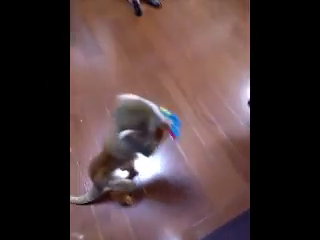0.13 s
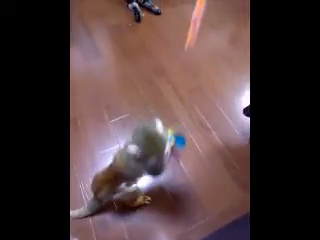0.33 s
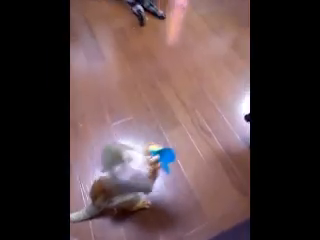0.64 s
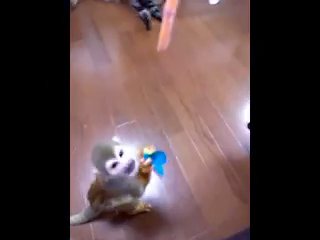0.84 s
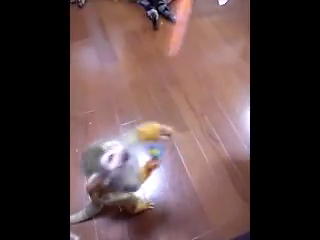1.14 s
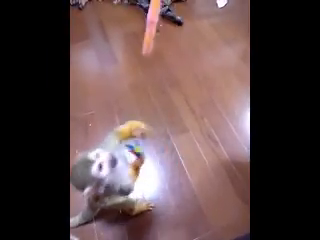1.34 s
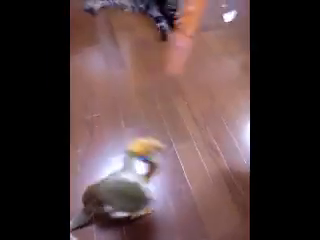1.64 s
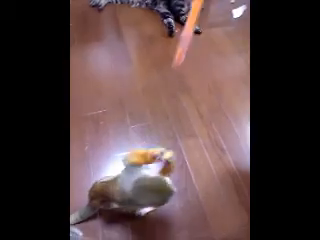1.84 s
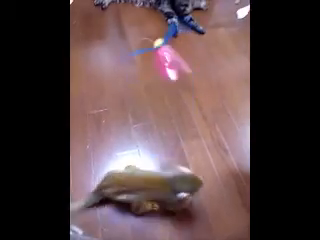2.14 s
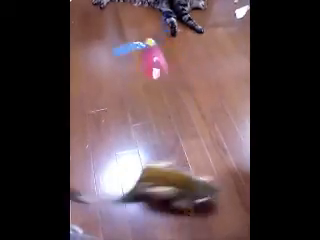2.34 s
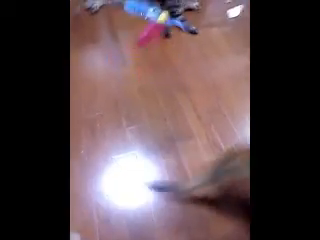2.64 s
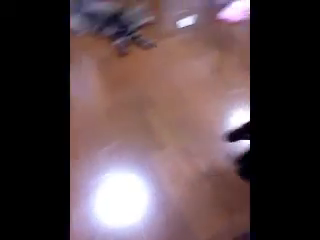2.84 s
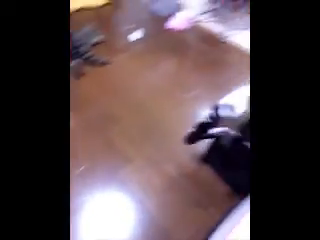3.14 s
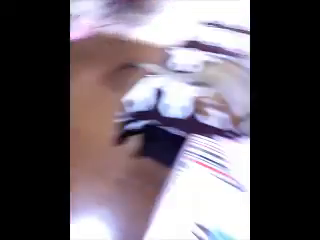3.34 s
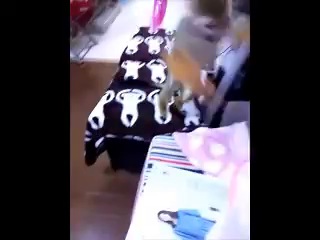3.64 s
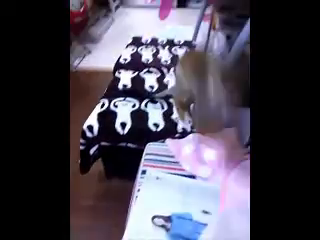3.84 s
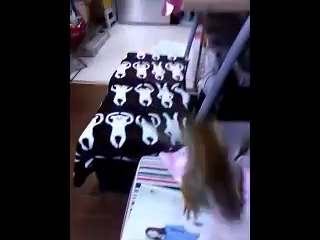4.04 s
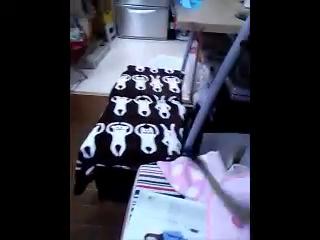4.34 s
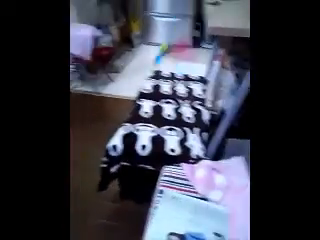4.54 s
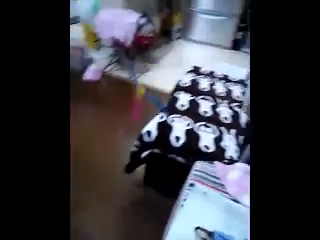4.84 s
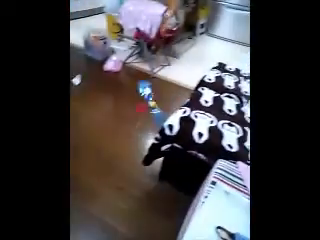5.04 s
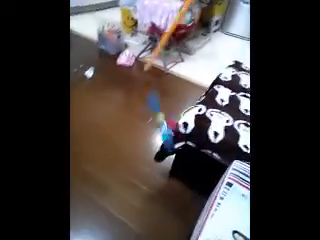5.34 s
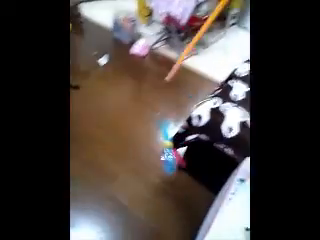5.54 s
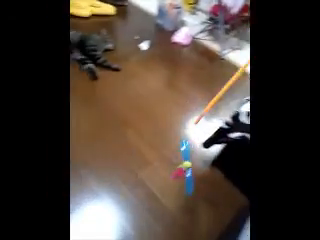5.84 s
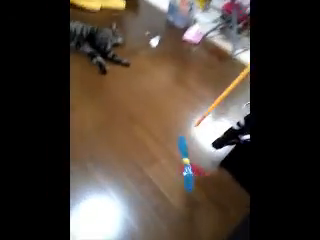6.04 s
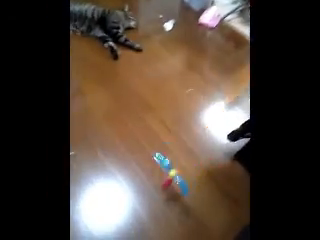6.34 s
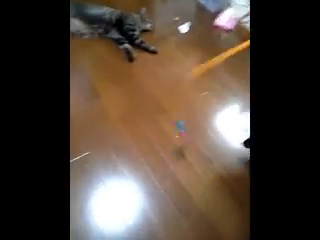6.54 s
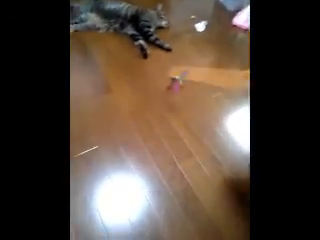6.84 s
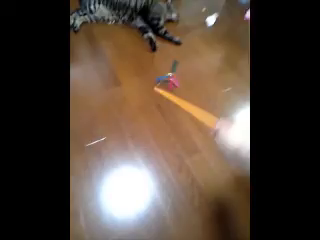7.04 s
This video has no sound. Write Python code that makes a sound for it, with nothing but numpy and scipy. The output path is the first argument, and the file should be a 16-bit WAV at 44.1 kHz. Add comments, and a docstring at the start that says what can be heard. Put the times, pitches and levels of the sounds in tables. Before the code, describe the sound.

Crisp plastic ticks and scuffs, hard knocks on wood and one deep thump over low handling rumble, then a soft swish across floorboards.

```python
"""A small pet monkey and a cat play with a plastic teaser toy on a wooden floor, close to a hand-held phone.
From the start the toy ticks, clacks and scuffs: bursts of tiny slips and short damped vibrations.
Bouts of movement raise low rumble, dull rub and bright rustle, all shaped noise with shared start and end times.
Knocks on wood ring as damped modes under padded pushes; a heavy thump near 4.5 s adds a deep boom.
Paws slide softly on bedding, then near 6 s the toy swishes over the boards; a small live room answers throughout."""
import sys
import numpy as np
from scipy import signal
from scipy.fft import rfft, irfft, next_fast_len
from scipy.io import wavfile
from scipy.ndimage import uniform_filter1d

SR = 44100
rng = np.random.default_rng(int(sys.argv[2]) if len(sys.argv) > 2 else 0)


def inscribe(sig):
    """Save sig as 16-bit PCM at rate SR to the path in sys.argv[1].

    A 1-D sig is mono; a 2-D sig holds one channel per row.
    Samples are clipped to [-1, 1] before scaling.
    """
    pcm = np.round(np.clip(np.atleast_2d(sig).T, -1, 1) * 32767)
    wavfile.write(sys.argv[1], SR, pcm.astype(np.int16))


N = 317387
T = np.arange(N) / SR  # time axis, s

# Colour of the handling rumble. Each row: frequency in Hz, spectrum level in dB.
HANDLING_COLOUR = [(12, -18.5), (22, 0.5), (31, -3), (45, -5), (62, -19), (100, -18.5), (150, -33.5),
                   (250, -33.5), (600, -60)]
# Colour of the dull rub and air. Each row: frequency in Hz, spectrum level in dB.
AIR_COLOUR = [(40, -0.5), (130, 9), (200, -3), (300, 0), (450, 2), (620, -4.5), (740, 1.5), (1000, -3),
              (1200, -18.5), (2000, -11.5), (4000, -25), (12000, -26)]
# Colour of the bright rustle. Each row: frequency in Hz, spectrum level in dB.
RUSTLE_COLOUR = [(800, 5), (2000, -2), (3000, -5.5), (5000, -6.5), (7000, -3.5), (9000, 2), (11500, 5),
                 (13000, -9)]
# Colour of sliding friction. Each row: frequency in Hz, spectrum level in dB.
SWISH_COLOUR = [(150, -21.5), (300, 1), (470, 5), (650, -6), (1000, 1), (1300, -3.5), (1800, -9),
                (2700, -12.5), (4000, -19.5), (7000, -28), (12000, -24.5)]
# Colour of slipping thin plastic. Each row: frequency in Hz, spectrum level in dB.
PLASTIC_COLOUR = [(300, -10), (1200, -15.5), (2000, -9.5), (2900, -6), (4000, -7), (6100, -2.5),
                  (7500, -1.5), (9500, 4), (11500, 5.5), (13000, 0.5)]
# Reverberation of the room. Each row: band centre in Hz, 60 dB decay time in s.
ROOM_DECAY = [(100, 0.23), (400, 0.24), (1500, 0.32), (5000, 0.28), (11000, 0.16)]
# Bouts of movement; each shakes the phone, rubs cloth and stirs fur at once.
# Each row: start in s, end in s (both at half amplitude), then rumble, dull rub and bright rustle in dB.
MOVEMENT_BOUTS = [(-.05, 0.57, -40, -53.5, -57.5), (0.564, 0.73, -49, -53, -67),
                  (0.796, 1.013, -41, -56, -56), (1.132, 1.432, -45, -59.5, -58.5),
                  (1.517, 1.951, -35, -48, -55), (1.938, 2.214, -41, -50.5, -58),
                  (2.213, 2.372, -35, -48.5, -51), (2.495, 2.715, -38.5, -53.5, -55),
                  (2.694, 2.868, -38.5, -46.5, -45), (3.028, 3.343, -35, -54.5, -49),
                  (3.378, 3.747, -33, -49, -51.5), (3.79, 4.175, -39, -56.5, -56),
                  (4.287, 4.496, -39, -63, -49), (4.464, 4.709, -27, -53, -50),
                  (4.73, 5.369, -33, -53.5, -58), (5.45, 6.79, -34, -54, -81),
                  (6.875, 7.045, -37.5, -51.5, -86), (7.102, 7.25, -38.5, -51.5, -72)]
# Levels between bouts. The entries: rumble, dull air and bright hiss in dB.
REST_LEVELS_DB = (-52, -58, -68)
# Duration of the fade at the end of a bout. The entries: rumble, dull rub and bright rustle in s.
BOUT_RELEASE_S = (0.056, 0.035, 0.38)
# Soft friction, first of paws on bedding, then of the toy gliding over the boards.
# Each row: middle in s, level in dB before the path gains, half length in s.
SLIDE_STROKES = [(4.735, -55, 0.7), (6.12, -43.5, .57)]
# A thin edge chafing. Each row: start in s, level in dB before onset and decay, 60 dB decay time in s.
CHAFE_STROKES = [(4.348, -44.5, .14), (6.058, -49.5, 0.66)]
# Scuffs of paws and crumpling toy blades.
# Each row: middle in s, peak level in dB, half length in s, top-end tilt in dB.
SCUFF_STROKES = [(0.01, -29, 0.016, -1.5), (0.044, -32.5, 0.018, -12), (0.534, -43, 0.021, -10),
                 (0.58, -21, 0.019, 15), (0.609, -32, 0.012, -2), (0.865, -50.5, 0.021, -6),
                 (0.992, -47.5, 0.018, -2.5), (1.693, -41.5, 0.058, -5.5), (1.873, -45.5, 0.059, 0.5),
                 (2.14, -46, 0.029, -11.5), (2.642, -44.5, 0.055, 5), (2.765, -34, 0.038, -9),
                 (3.063, -52, 0.04, -11), (4.343, -51, 0.027, -6), (4.784, -46, 0.084, -0.5)]
# Landings on wood. Each row: start in s, level in dB, time scale of contact in ms,
# deep boom against the knock in dB, share sent to the room in dB.
LANDINGS = [(3.166, -27, 0.47, -30, -6), (3.1762, -23.5, 0.44, -31, -2), (3.186, -31.5, 0.54, -22, 1),
            (3.421, -39, 5.2, -5, 8), (3.5057, -10.5, 0.31, -17, -10), (3.526, -22.5, 0.8, -7, -16),
            (3.542, -21, 0.75, -24, -14), (3.806, -39.5, 0.21, -30, 3.5), (4.5185, -26, 0.4, -11, -3.5),
            (4.5200, -16, 1.3, 10, -4.5), (4.547, -27.5, 0.58, 8, -5.5), (4.62, -25, 0.19, 2.5, -21),
            (4.807, -44, 2, -14, 0), (4.998, -34, 0.58, -22, -17), (6.78, -42, 3.1, -17, 3.5),
            (6.894, -51.5, 1, -16, 11.5)]
# Modes of the struck wood. Each row: nominal frequency in Hz, 60 dB decay time in s, strength in dB.
WOOD_MODES = [(294, 0.028, 1), (380, 0.012, 6), (565, 0.04, -4.5), (700, 0.016, 3.5), (1004, 0.011, 0.5),
              (1405, 0.0095, 4), (1940, 0.0089, 2), (2750, 0.0089, 3.5)]
# Stiff parts of toy and furniture. Each row: start in s, level in dB, pitch in Hz, 60 dB decay time in ms.
CLACK_NOTES = [(.668, -32.5, 5920, 3.3), (0.8878, -30.5, 5940, 5.3), (2.6722, -36, 5870, 6),
               (2.847, -39, 1700, 33), (3.056, -47.5, 1570, 98), (3.168, -24.5, 594, 24),
               (3.1775, -25, 566, 26), (3.8065, -37, 800, 22), (4.6197, -24, 1360, 8.7),
               (4.622, -24.5, 494, 26), (4.663, -37.5, 2590, 7), (4.674, -26.5, 423, 10.7),
               (4.712, -36.5, 2750, 4.4), (4.998, -60, 806, 10), (6.060, -42, 2700, 7)]
# Sharp ticks of plastic and claws. Each row: start in s, level in dB, time scale in ms,
# top-end tilt in dB, share sent to the room in dB.
TICK_HITS = [(0.0488, -21.5, 1.4, 20, 1), (0.3855, -43.5, 6.7, -11, -4), (0.501, -44, 2.2, 6, 0),
             (0.5541, -15.5, 2.2, 13.5, -5), (0.6651, -31, 5.4, -2, 0.5), (0.8839, -26, 4.8, 2, 2.5),
             (1.708, -36, 5.8, -16, -5), (1.808, -36.5, 4.5, -3.5, -1), (2.119, -41, 2.9, 14, 6.5),
             (2.672, -31, 5.2, 0, 1), (2.752, -22, 6.3, -2, 1.5), (2.807, -25, 3.8, -6.5, -4.5),
             (2.846, -29.5, 5.8, 1, -3), (3.057, -34.5, 9.1, -9, -4), (3.175, -39, 3.5, 3, -2),
             (4.2243, -29, 4, -0.5, 4), (4.6168, -26, 8.3, -4, -1.5), (4.663, -24, 1.4, 2, -5),
             (4.673, -30, 1.6, -5, -6), (4.7096, -23, 1.6, -1.5, -8.5), (4.977, -35, 7.7, 5.5, -1),
             (5.217, -38, 2.9, 9, -0.5)]

BOUT_ATTACK_S = 0.071
# the floor's reflection: lag at the middle of a slide and strength
SLIDE_ECHO_MS, SLIDE_ECHO_DB = 2.323, -16.5
SLIDE_ECHO_SHRINK = 0.2  # one half length away, the lag is divided by 1 plus this
CHAFE_HZ, CHAFE_RING_S, CHAFE_ATTACK_S = 2800, 0.008, 0.003
PAD_HZ = 3260  # soft paws put in next to nothing above this
BOOM_HZ, BOOM_T60_S = 104, 0.06
STIFF_ROOM_DB = -13  # share of clacks and chafes sent to the room
FAR_DIRECT_DB, FAR_ROOM_DB = -1.0, -6.0  # path gains of slides and rub
TOP_HZ = 12080


def undb(db):
    """Amplitude gain is an exponential function of decibels."""
    return 10 ** (np.asarray(db) / 20)


def unit(x):
    """Dividing by the root mean square gives a signal unit power."""
    return x / np.sqrt(np.mean(x ** 2))


def on_log_hz(points, hz):
    """Values between (Hz, value) points are interpolated on a logarithmic frequency axis."""
    f, value = np.transpose(points)
    return np.interp(np.log(hz + 1), np.log(f), value)


def colour(x, points, tilt_db=0, hinge_hz=8000):
    """A folded cepstrum gives the causal, minimum-phase filter of a spectrum; tilt raises its top end."""
    size = 2 * next_fast_len(len(x))
    hz = np.arange(size // 2 + 1) * SR / size
    db = on_log_hz(points, hz) + tilt_db * np.tanh((hz - hinge_hz) / 2200) / 2
    cepstrum = irfft(np.log(undb(db)))
    cepstrum[1:size // 2] *= 2
    cepstrum[size // 2 + 1:] = 0
    response = np.exp(rfft(cepstrum))
    return irfft(rfft(x, size) * response)[:len(x)]


def walk(rate):
    """Random levels held for 1 / rate s and averaged twice make a slow fluctuation of rms 1."""
    hold = int(SR / rate)
    steps = np.repeat(rng.standard_normal(N // hold + 1), hold)
    smooth = uniform_filter1d(uniform_filter1d(steps, hold), hold)
    return unit(smooth[:N])


def waver(x, depth_db, rate):
    """Independent gains in overlapping third-octave bands keep the colour of a noise shifting."""
    size = next_fast_len(N)
    spectrum = rfft(x, size)
    hz = np.arange(len(spectrum)) * SR / size
    band = np.clip(3 * np.log2((hz + 1) / 200), 0, 14)  # the end bands take in all that lies beyond
    out = 0
    for k in range(15):
        part = irfft(spectrum * np.maximum(1 - abs(band - k), 0), size)[:N]
        out = out + part * undb(depth_db * walk(rate))
    return unit(out)


def grains(count, spread_db):
    """Friction is a dense series of tiny impulses of very unequal size."""
    excess = np.minimum(rng.exponential(size=count), 5)
    return rng.standard_normal(count) * undb(spread_db * excess)


def mode(hz, t60_s):
    """A damped resonance is a sine under an exponential decay."""
    t = T[:8192]
    return undb(-60 * t / t60_s) * np.sin(2 * np.pi * hz * t)


def hit_level(x, db):
    """A transient is scaled by energy: that of 5 ms of steady sound at this level."""
    return x * undb(db) * np.sqrt(0.005 * SR / np.sum(x ** 2))


def add(track, s, sound, sends=1):
    """Sounds superpose linearly: mix one in at a time, with one gain for each row of the track."""
    start = int(s * SR)
    part = sound[max(-start, 0):N - start]
    track[..., max(start, 0):max(start, 0) + len(part)] += np.multiply.outer(sends, part)


def room(x, gap_s=0.0088):
    """Reverberation: after a short gap, walls and furniture return a dense decaying tail of equal energy."""
    t = T[:20000]
    spectrum = rfft(rng.standard_normal(len(t)))
    hz = np.arange(len(spectrum)) * SR / len(t)
    tail = 0
    for centre, t60 in ROOM_DECAY:
        band = on_log_hz([(f, float(f == centre)) for f, _ in ROOM_DECAY], hz)
        tail = tail + irfft(spectrum * band) * undb(-60 * t / t60)
    growth = (t / gap_s) ** 4
    tail = tail * growth / (1 + growth)
    return signal.fftconvolve(x, tail / np.sqrt(np.sum(tail ** 2)))[:N]


def movement():
    """Powers of independent noises add: bouts set in, hold and fade. Rows: gain of rumble, rub, rustle."""
    power = np.outer(undb(REST_LEVELS_DB) ** 2, np.ones(N))
    release_s = np.array(BOUT_RELEASE_S)[:, None]
    for start, end, *db in MOVEMENT_BOUTS:
        ramp = np.minimum((T - start) / BOUT_ATTACK_S, (end - T) / release_s)
        bout = np.clip(0.5 + ramp, 0, 1)
        power = power + (undb(db)[:, None] * bout) ** 2
    return np.sqrt(power)


def handling(gain):
    """Structure-borne rumble of the hand holding the phone: low noise, evened out and then set by the gain."""
    rumble = colour(rng.standard_normal(N), HANDLING_COLOUR)
    return gain * rumble / np.sqrt(uniform_filter1d(rumble ** 2, size=6000))


def rubbing(gain):
    """Cloth friction is dull, gently wavering noise that sinks back into the room's air."""
    return waver(colour(rng.standard_normal(N), AIR_COLOUR), depth_db=3.5, rate=22) * gain


def stirring(gain, flutter_db=0.85):
    """Many fine slips add up to a bright rustle that never quite stops while the animals move."""
    rustle = unit(colour(grains(N, spread_db=1.5), RUSTLE_COLOUR))
    return rustle * gain * undb(flutter_db * walk(45))


def slide(uneven_db=1.14):
    """Comb filtering by the floor's reflection shifts the colour of friction hiss as the contact moves."""
    hiss = waver(colour(grains(N, spread_db=2.5), SWISH_COLOUR), depth_db=2.3, rate=22)
    out = 0
    for s, db, half_s in SLIDE_STROKES:
        away = ((T - s) / half_s) ** 2
        lag_s = SLIDE_ECHO_MS / 1000 / (1 + SLIDE_ECHO_SHRINK * away)
        echo = undb(SLIDE_ECHO_DB) * np.interp(T - lag_s, T, hiss)
        out = out + unit(hiss + echo) * undb(db) * np.exp(-away)
    return out * undb(uneven_db * walk(28))


def chafes():
    """Sustained excitation: slips keep one stiff resonance ringing in a narrow, bright, fading note."""
    out, t = np.zeros((2, N)), T[:16384]
    for s, db, t60_s in CHAFE_STROKES:
        slips = grains(len(t), spread_db=2.5)
        ring = unit(signal.fftconvolve(slips, mode(CHAFE_HZ, CHAFE_RING_S))[:len(t)])
        onset = 1 - np.exp(-t / CHAFE_ATTACK_S)
        decay = np.exp(-np.log(1000) * t / t60_s)
        add(out, s, ring * onset * decay * undb(db), [1, undb(STIFF_ROOM_DB)])
    return out


def scuffs(room_db=-6):
    """A scuff is a swelling and fading cloud of slips, with the plastic colour of a tick."""
    out, t = np.zeros((2, N)), T[:16384]
    middle = t[-1] / 2
    for s, db, half_s, tilt_db in SCUFF_STROKES:
        cloud = unit(colour(grains(len(t), spread_db=1.5), PLASTIC_COLOUR, tilt_db))
        swell = np.exp(-((t - middle) / half_s) ** 2)
        add(out, s - middle, undb(db) * cloud * swell, [1, undb(room_db)])
    return out


def knocks():
    """A padded push excites the modes of wood; longer contact is duller, and a deep boom carries the weight."""
    out, t = np.zeros((2, N)), T[:1024]
    pad = signal.butter(6, PAD_HZ, fs=SR, output="sos")
    for s, db, contact_ms, boom_db, room_db in LANDINGS:
        age = t * 1000 / contact_ms
        push = signal.sosfilt(pad, age ** 2 * np.exp(-3 * age))
        detune = 1 + 0.06 * rng.standard_normal(len(WOOD_MODES))
        ring = 0
        for (hz, t60, strength_db), d in zip(WOOD_MODES, detune):
            # the air follows the speed of the boards, so each mode starts at its crest
            ring = ring + undb(strength_db) * np.diff(mode(hz * d, t60)) / hz
        knock = signal.fftconvolve(-push, ring)
        boom = signal.fftconvolve(push, mode(BOOM_HZ, BOOM_T60_S))
        add(out, s, hit_level(knock, db), [1, undb(room_db)])
        add(out[0], s, hit_level(boom, db + boom_db))
    return out


def clacks():
    """Free vibration: a stiff part close by rings briefly at one pitch; little of it reaches the walls."""
    out = np.zeros((2, N))
    for s, db, hz, t60_ms in CLACK_NOTES:
        onset = 1 - np.exp(-T[:8192] * hz)  # builds up over about one cycle
        ring = mode(hz, t60_ms / 1000) * onset
        add(out, s, hit_level(ring, db), [1, undb(STIFF_ROOM_DB)])
    return out


def ticks():
    """Thin plastic slips in a burst of milliseconds. Rows: direct sound, sound going to the walls."""
    out, t = np.zeros((2, N)), T[:2048]
    for s, db, ms, tilt_db, room_db in TICK_HITS:
        age = t * 1000 / ms
        slips = grains(len(t), spread_db=1) * age * np.exp(-2.8 * age)
        add(out[0], s, hit_level(colour(slips, PLASTIC_COLOUR, tilt_db), db))
        # summed over all directions the slips blend into one smooth click
        click = colour(signal.unit_impulse(len(t)), PLASTIC_COLOUR, tilt_db)
        add(out[1], s, hit_level(click, db + room_db))
    return out


def scene():
    """By superposition, direct sounds, reverberation and handling rumble add up on one microphone."""
    rumble, rub, rustle = movement()
    far = slide() + rubbing(rub)
    direct, to_walls = chafes() + scuffs() + knocks() + clacks() + ticks()
    reverberation = room(to_walls + undb(FAR_ROOM_DB) * far)
    near = direct + stirring(rustle) + handling(rumble)
    return (near + undb(FAR_DIRECT_DB) * far + reverberation)[None]


def record(dry):
    """Band limiting: the phone cuts the top with a steep elliptic low-pass."""
    low_pass = signal.ellip(12, 0.2, 70, TOP_HZ, fs=SR, output="sos")
    return signal.sosfilt(low_pass, dry)


dry = scene()
out = record(dry)
inscribe(out)
```